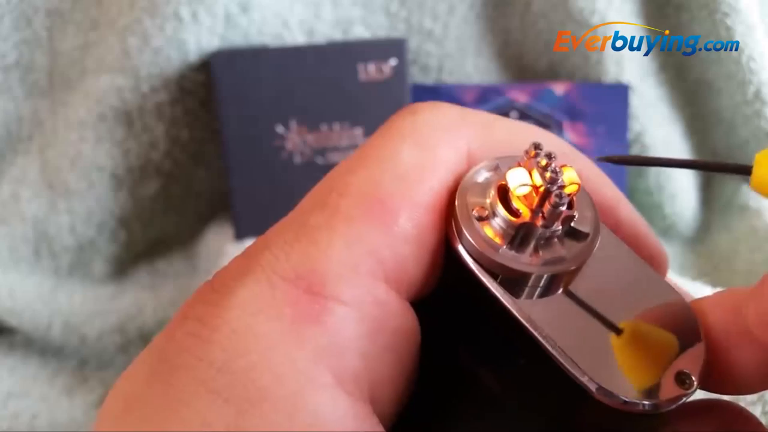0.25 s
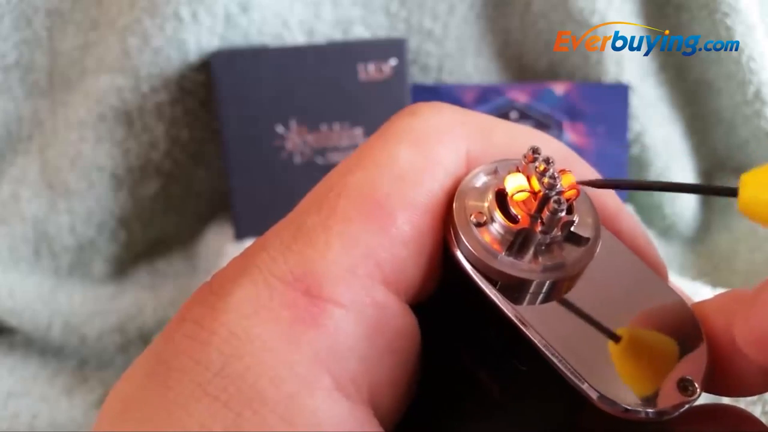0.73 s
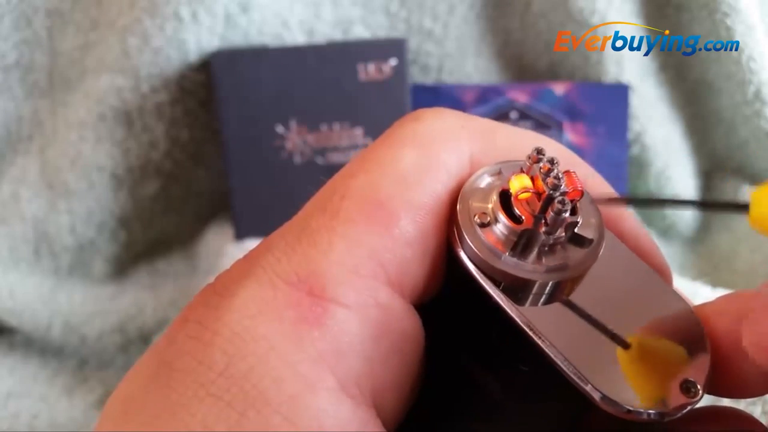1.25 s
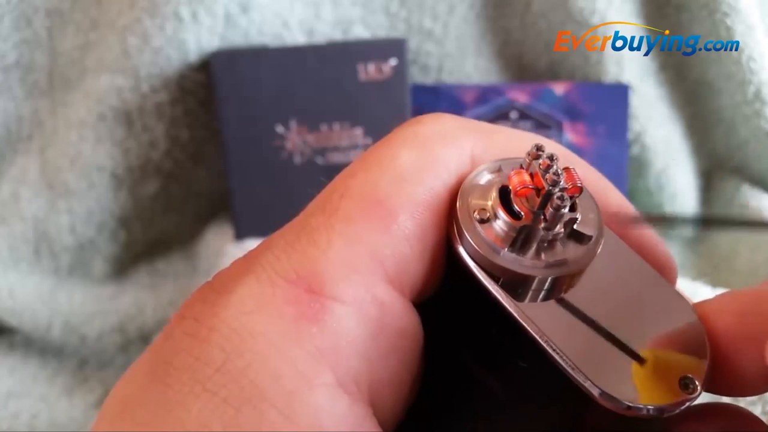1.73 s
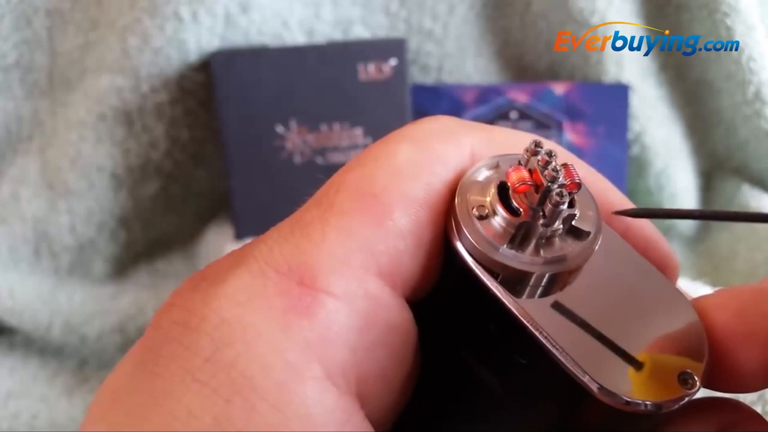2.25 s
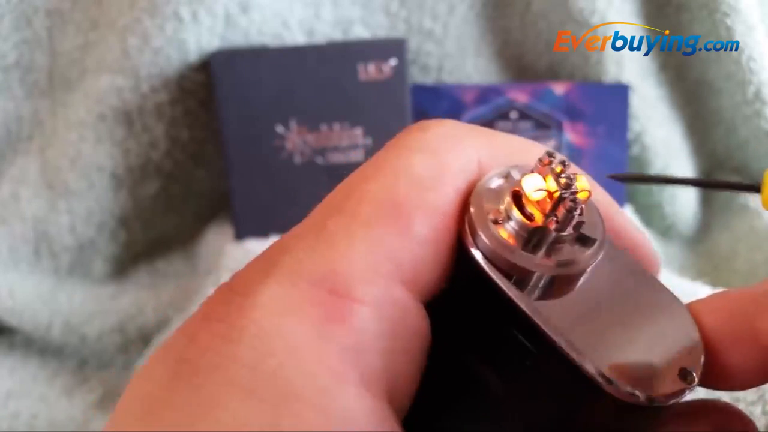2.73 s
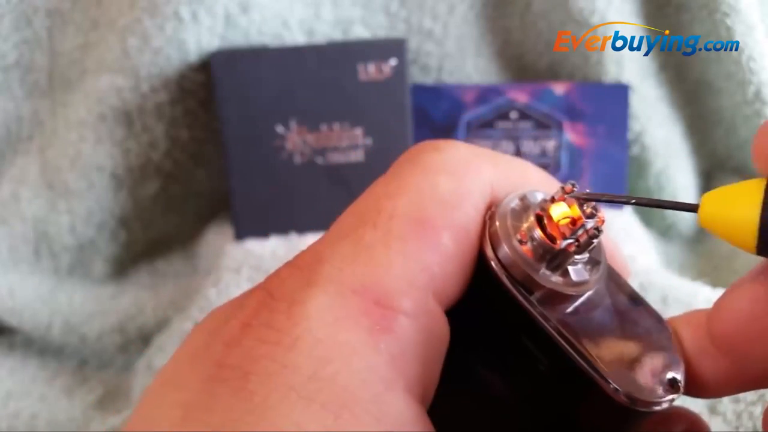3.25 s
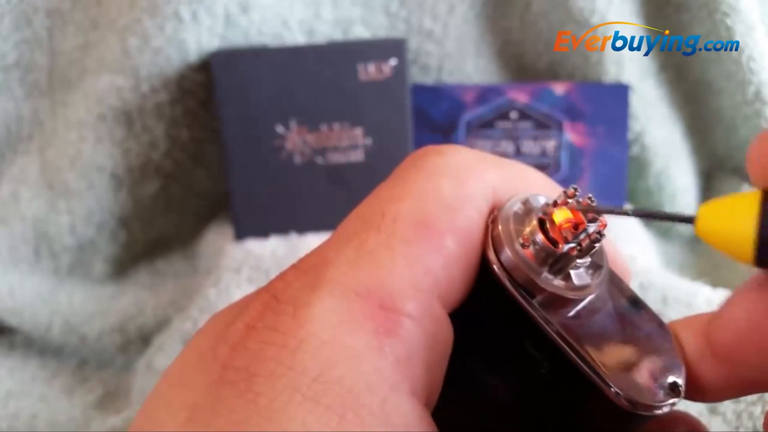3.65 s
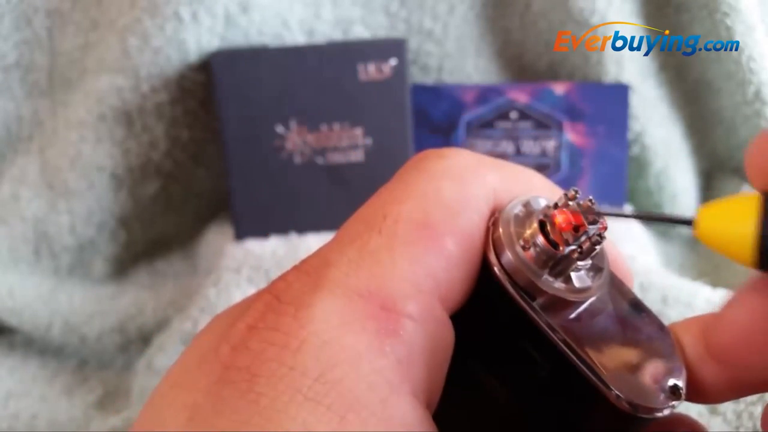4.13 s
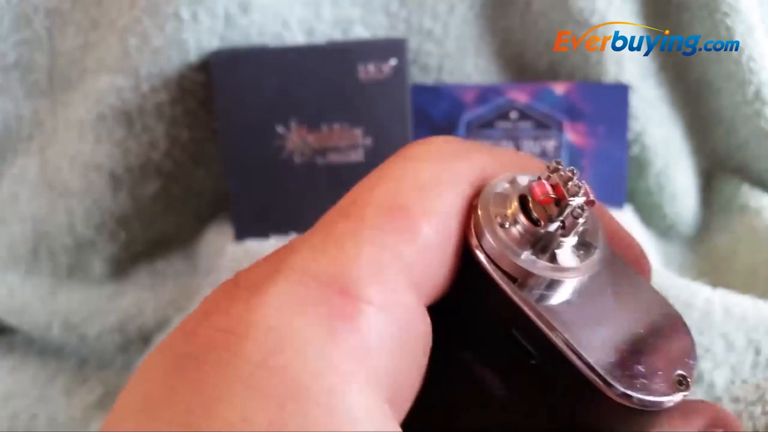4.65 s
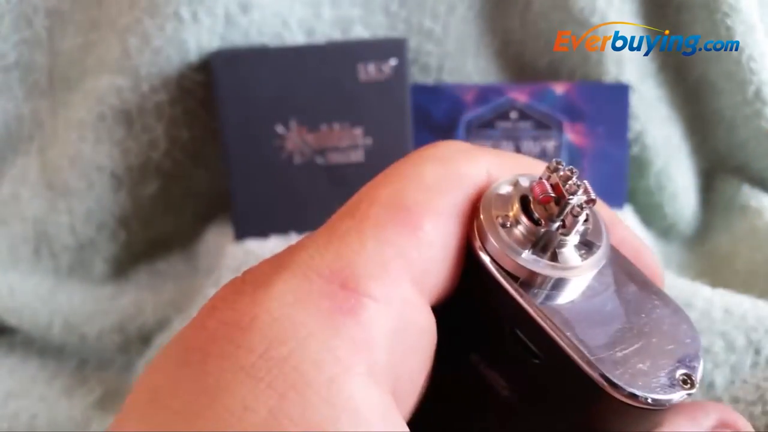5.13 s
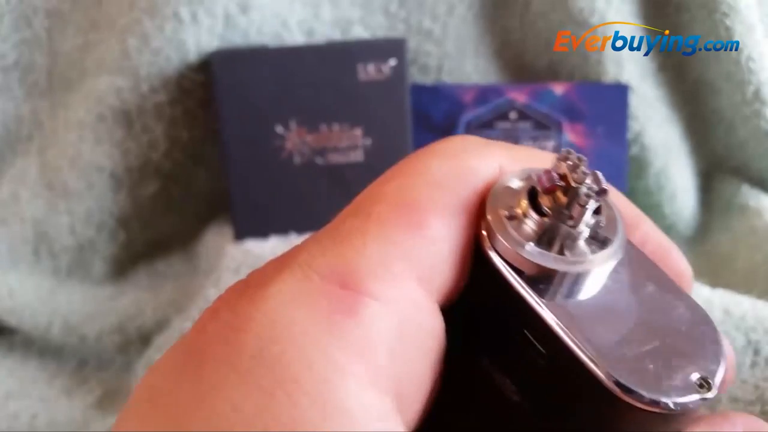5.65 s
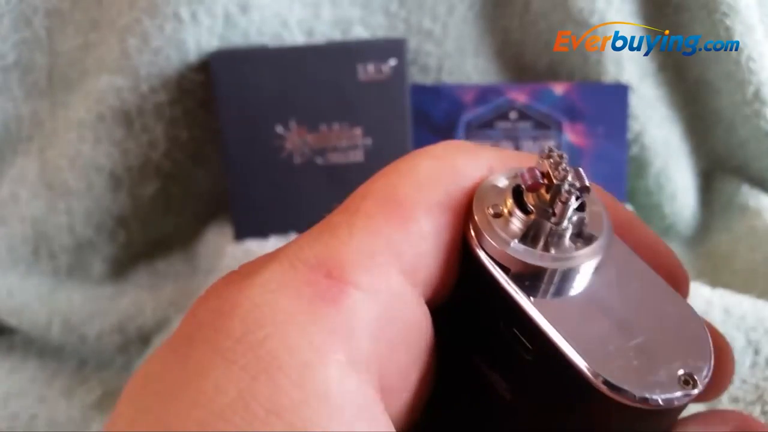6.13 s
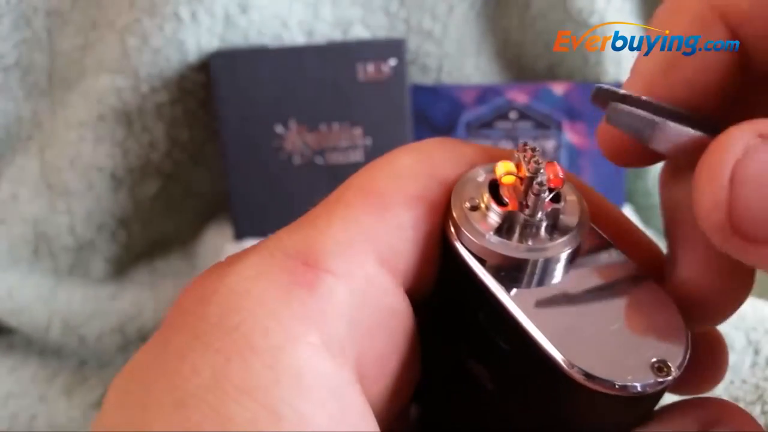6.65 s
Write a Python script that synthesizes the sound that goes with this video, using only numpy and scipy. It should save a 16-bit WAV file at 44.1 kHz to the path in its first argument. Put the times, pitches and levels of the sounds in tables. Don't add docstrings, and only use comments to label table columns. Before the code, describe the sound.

Close up in a quiet humming room, metal scrapes finely across small coils, then a tool clatters down hard and a small part is lifted.

```python
import sys
import numpy as np
from scipy import signal
from scipy.fft import rfft, irfft, next_fast_len
from scipy.io import wavfile
from scipy.ndimage import uniform_filter1d, map_coordinates

SR = 44100
rng = np.random.default_rng(int(sys.argv[2]) if len(sys.argv) > 2 else 0)


def put_to_file(sound):
    columns = np.atleast_2d(sound).T
    safe = np.clip(columns, -1, 1)
    whole_steps = np.round(safe * 32767)
    wavfile.write(sys.argv[1], SR, whole_steps.astype(np.int16))


def gain_from_decibels(decibels):
    exponent = np.asarray(decibels, float) / 20
    return 10 ** exponent


N = 303981

# start in seconds, length in seconds, scrape, low post, upper post in dB.
STROKES = [(1.257, 0.05, -57, -67, -53), (1.311, 0.064, -60.5, -60, -58), (1.536, 0.035, -48, -53.5, -56),
           (1.799, 0.024, -45, -51, -47), (2.029, 0.032, -49.5, -53.5, -56.5),
           (2.278, 0.021, -56, -52, -51), (4.036, 0.047, -49.5, -62.5, -53),
           (4.284, 0.033, -52.5, -60, -51), (4.52, 0.022, -49, -58, -49), (4.738, 0.052, -50.5, -63, -54),
           (4.935, 0.024, -34.5, -55, -46.5)]
# slip in seconds, peak in dB, lower scrape relative to it in dB.
TURNS = [(1.2726, -45, -24), (1.2929, -36, -21), (1.309, -50, -22), (1.3253, -36, -21.5), (1.341, -55, -17),
         (1.5418, -34, -15), (1.548, -43, -19), (1.5554, -40, -16), (1.562, -34, -17), (1.567, -37, -20),
         (1.57, -40, -11), (1.577, -48.5, -16), (1.802, -30, -13.5), (1.8116, -39.5, 1), (1.82, -27, -16),
         (1.8283, -53, -15.5), (2.033, -37, -6.5), (2.0408, -35, -8.5), (2.0486, -36.5, -6.5),
         (2.054, -30, -18), (2.0594, -36, -10), (2.0634, -31, -15.5), (2.0696, -44, -8), (2.2669, -39, -3),
         (2.276, -33, -12), (2.2816, -30.5, -22), (2.2865, -25, -15), (2.289, -37, -22), (2.292, -41, -14),
         (4.0398, -41, -11), (4.05, -39, -19), (4.0583, -41, -16), (4.071, -47, -21), (4.0784, -38, -23.0),
         (4.0844, -52, -17.0), (4.287, -31.5, -22), (4.295, -35.5, -14), (4.301, -37.5, -24),
         (4.3058, -38, -16), (4.3086, -42, -22.5), (4.3122, -37.5, -26), (4.3178, -34, -19.0),
         (4.526, -39, -7), (4.5307, -30.5, -14), (4.535, -34, -18), (4.5397, -38, -17.0),
         (4.5428, -34, -15), (4.5484, -37, -4.5), (4.7495, -28, -13.5), (4.756, -30, -13),
         (4.7614, -39.5, -6), (4.766, -42.5, -20), (4.771, -30, -20), (4.7768, -36, -18), (4.924, -47, -10),
         (4.936, -38, -12), (4.94, -38, -18), (4.9458, -34, -20), (4.949, -39, -22), (4.9551, -34, -13)]
# slip in seconds, peak in dB.
SNAGS = [(1.24, -65), (1.246, -62), (1.254, -62), (1.258, -53), (1.263, -52), (1.2665, -51), (1.269, -50),
         (1.285, -52), (1.2875, -52), (1.29, -47.5), (1.2995, -50), (1.306, -53), (1.333, -51),
         (1.348, -58.5), (1.355, -57), (1.512, -54.5), (1.775, -61.5), (1.793, -60.5), (1.807, -40),
         (1.815, -38.5), (1.824, -49), (2.023, -57), (2.0305, -52), (2.038, -42), (4.032, -52),
         (4.0655, -53), (4.503, -56), (4.515, -52), (4.551, -44), (4.7455, -46), (4.782, -44), (4.921, -42),
         (4.9325, -38.5), (4.9452, -39), (4.959, -49)]
# frequency in Hz, density in dB per Hz.
WIRE_COLOUR = [(2060, -25), (3300, -4.5), (4200, -6.5), (5000, -7), (6410, -2), (8140, -0.5), (10700, 4.5),
               (14400, -2.5), (15600, -11), (16300, -29)]
# frequency in Hz, density in dB per Hz.
LOW_POST_COLOUR = [(500, -62.5), (800, 1), (1050, 3.5), (1400, -5), (1900, -11)]
# frequency in Hz, density in dB per Hz.
HIGH_POST_COLOUR = [(1500, -27), (1950, 1), (2300, 0), (2900, -6), (3800, -15.5), (5000, -59)]
# frequency in Hz, left over right in dB.
WIRE_BALANCE = [(60, -20), (110, -23), (200, -13), (380, 16), (700, -1), (1290, -2), (2380, -1.5),
                (4400, 8.5), (8120, 2.5), (15000, -19.5)]

# start in seconds, peak in dB, panel boom in dB,
# left over right in dB, ring length as a share.
KNOCKS = [
    [(5.6453, -15.5, -16, 3.5, 0.71), (5.6495, -25.5, -21.5, -3.5, 0.66), (5.6585, -28.5, -18, 7, 0.67),
     (5.6878, -32.5, -12.5, 6.5, 0.98), (5.786, -43, -0.5, 9.5, 0.97), (6.834, -45, -9, 9, 1),
     (6.768, -45, -18, 8, 1)],
    [(5.6655, -30.5, 8.5, 8, 0.46), (5.7595, -42.5, 13.5, 5, 0.45), (5.813, -48.5, 10, 9.5, 0.32),
     (5.8991, -9, -12, 11, 0.94)],
    [(5.9369, -13.5, -29, 12.5, 1.29)],
    [(.6815, -42, -40, 2, 0.4), (2.509, -42.5, -40, 4, 0.33), (3.309, -46.5, -44, 6, 0.6)],
]
# frequency in Hz, t60 in seconds, level in dB at each of the four spots.
TABLE_MODES = [(61.8, 0.25, -32.5, -31.5, -22, -40), (268, 0.098, -4, -25, -30.5, -16),
               (356.4, 0.051, -11.5, -0.5, -14, -17), (424, 0.035, 0, -4.5, -12.5, 5),
               (666, 0.013, 6.5, 7, 3, 16), (877, 0.034, -3, -8.5, 2, 1),
               (1026, 0.039, -2.5, 0.5, -8.5, -22), (1208, 0.025, -11.5, -20, -13.5, -32),
               (1600, 0.017, -10.5, -4, -13, -40), (1847, 0.014, -12.5, -11, -6, -40),
               (2010, 0.018, -17, -2, -2, -53), (2235, 0.025, -26, -23, -7, -50),
               (2590, 0.24, -26.5, -29, -40.5, -60), (3400, 0.1, -35, -21, -45.5, -56)]
# frequency in Hz, left over right in dB.
TABLE_BALANCE = [(200, -1), (380, 5.5), (700, -0.5), (1300, -6.5), (2400, -7), (4400, 2.5)]
# start in seconds, peak in dB, pitch in Hz.
CHATTER = [(5.7597, -29, 230), (5.7641, -30.5, 300), (5.7667, -36, 480), (5.7695, -35, 520),
           (5.773, -27.5, 340), (5.7793, -40.5, 400), (5.7818, -31.5, 480), (5.7865, -34, 500),
           (5.7888, -34.5, 620), (5.793, -36, 450), (5.7954, -35, 450), (5.7998, -32.5, 620),
           (5.8039, -40.5, 500), (5.813, -34, 300), (5.82, -36, 280), (5.8349, -38, 300),
           (5.8406, -34.5, 350), (5.848, -41.5, 400), (5.858, -38.5, 500), (5.8663, -41, 600),
           (5.869, -36.5, 520), (5.872, -37, 480), (5.8775, -35.5, 400), (5.717, -38, 500)]

# start in seconds, crack, mid crack, ring in dB, ring pitch in Hz.
CLINKS = [(5.6428, -34, -52, -50, 7350), (5.6423, -70, -70, -42, 3740), (5.6483, -35, -60, -47, 7160),
          (5.659, -44, -52, -51, 7330), (5.6668, -39, -55, -53, 7540), (5.691, -33, -63, -40.5, 7400),
          (5.7586, -51, -66, -53, 7400), (5.7597, -72, -75, -57.5, 5040), (5.7656, -53, -68, -51.5, 7900),
          (5.7854, -47, -63, -50, 7810), (5.792, -57, -69, -52, 7240), (5.851, -54, -56, -47, 7780),
          (5.856, -55, -62, -58, 7970), (5.872, -59, -61, -65.5, 7350), (5.9, -36, -22, -43, 7180),
          (5.935, -55, -61, -44.5, 6700), (5.938, -43, -42, -37.5, 7900), (5.953, -41, -59.5, -44.5, 7200),
          (5.961, -50, -62.5, -48, 7120), (5.997, -49.5, -65, -75, 7350), (6.0322, -50, -71.5, -79, 7200),
          (6.0465, -57, -76, -79, 7230), (6.062, -63.5, -70, -73, 6400), (6.096, -62.5, -66, -75, 7270),
          (6.1755, -61, -67.5, -78, 7220), (6.2205, -90, -70.5, -64, 2900), (6.255, -76, -61, -65, 2860),
          (3.31, -72, -85, -90, 5800), (6.758, -67, -73.5, -77, 7100), (6.7857, -75, -64, -80, 7400),
          (6.815, -62, -66, -61, 7670), (6.827, -65, -70, -69, 7700), (6.834, -45, -63, -54, 7620),
          (6.839, -57, -63, -65, 4900), (6.848, -56, -68, -61, 7600)]
# start in seconds, crack in dB, ring in dB, ring t60 in seconds.
PINGS = [
    (6.269, -56, -58.5, .12),
    (6.4305, -77, -65, .22),
]
# frequency in Hz, density in dB per Hz.
CRACK_COLOUR = [(3000, -38), (4500, -5.5), (7500, -3.5), (9200, -10), (11000, -7.5), (15500, -18),
                (16000, -66)]

# peak in seconds, hold in seconds, low layer in dB, rasp in dB, release in dB per second.
ROLL = [
    (5.647, 0.018, -38, -45.5, 291),
    (5.76, 0.025, -47, -66.5, 76.5),
    (5.875, 0.0077, -72, -77.5, 500.5),
    (5.898, .025, -56, -60.5, 404),
    (5.939, 0.001, -31, -45.5, 704),
    (5.974, 0.029, -77.5, -70, 104),
]
# peak in seconds, hold in seconds, scrape in dB, rasp in dB, release in dB per second.
GRAZE = [
    (6.2545, 0.029, -63, -91, 1600),
    (6.269, 0, -82.5, -58, 1900),
]
# peak in seconds, hold in seconds, rumble in dB, rasp in dB, release in dB per second.
LIFT = [
    (6.772, 0.051, -50, -99, 451),
    (6.84, 0.0039, -63, -59, 352),
]
# frequency in Hz, density in dB per Hz.
ROLL_COLOUR = [(65, -43.5), (110, -12.5), (151, -9.5), (441, -8.5), (546, -14.5), (639, -15.5), (956, -28),
               (1600, -30.5), (2080, -65.5), (3520, -120)]
# frequency in Hz, density in dB per Hz.
RASP_COLOUR = [(1470, -34), (2500, -7), (5310, -11), (7250, -4.5), (8870, -24), (10400, -14.5),
               (15600, -25), (16000, -37.5)]
# frequency in Hz, density in dB per Hz.
NAIL_COLOUR = [(2000, -40), (2700, 0), (3600, -5), (4600, -26)]
# frequency in Hz, density in dB per Hz.
SCUFF_COLOUR = [(90, -7), (150, 3), (280, -7.5), (430, 2), (720, -8), (1150, -7), (1600, -20), (2300, -62)]
# frequency in Hz, density in dB per Hz.
FIZZ_COLOUR = [(2060, -55.5), (3500, -26), (4810, -2), (6010, -14), (7560, 2), (9440, -20), (15200, -27),
               (16000, -49)]

# frequency in Hz, level in dB rms.
MOTOR_LINES = [(33.7, -72), (54.6, -82), (58.3, -53), (75.5, -77.5), (85.9, -69.5), (116.6, -63.5),
               (119.9, -78), (154.8, -65), (174.8, -63.5), (227.4, -65.5), (233.1, -64.5), (236.5, -67.5),
               (240.0, -67), (264.4, -78.5), (267.5, -81), (291.3, -75.5), (298.3, -72), (303.3, -60),
               (349.7, -70), (377.8, -83.5), (407.9, -89.5), (430.5, -87), (483.4, -72.5), (507.1, -75),
               (582.7, -76), (641.0, -78.5)]
# frequency in Hz, level in dB rms.
WHINE_LINES = [(2134, -77.5), (2252, -90), (2296, -76.5), (2306, -78.5), (2329, -73.5), (2361, -75),
               (2425, -85), (2458, -91.5), (2483, -89.5), (2517, -88)]
# frequency in Hz, density in dB per Hz.
RUMBLE_COLOUR = [(12, -130), (25, -93), (50, -79), (70, -82.5), (130, -85.5), (200, -79), (250, -81.5),
                 (340, -83.5), (450, -90), (850, -94), (1020, -92), (1200, -99), (1500, -101), (2000, -150)]
# frequency in Hz, density in dB per Hz.
AIR_COLOUR = [(760, -41), (1300, -22.5), (1590, -13.5), (1760, -10), (2010, -11), (2250, -6), (2380, -2.5),
              (2750, -15.5), (3230, -12.5), (4010, -29), (4890, -42), (6380, -37), (9590, -62),
              (12500, -44), (16200, -66.5), (22000, -120)]
# frequency in Hz, density in dB per Hz.
HISS_COLOUR = [(10500, -53), (12000, -13), (13000, -10), (14000, -3), (14800, -6), (15500, -5),
               (15900, -61.5)]
# frequency in Hz, density in dB per Hz.
CIRCUIT_COLOUR = [(3500, -44), (4500, -2.5), (7500, -2), (8100, -8.5), (10300, -5.5), (11800, 0),
                  (12500, -41)]
# frequency in Hz, likeness from 0 to 1.
ROOM_LIKENESS = [(60, 0.74), (150, 1), (380, 0.42), (950, 0.019), (2380, 0.052), (5980, 0.01),
                 (15000, 0.12)]
# frequency in Hz, left over right in dB.
ROOM_BALANCE = [(60, -1.5), (110, 2), (200, 0.5), (380, 0.5), (700, 4), (1290, 0.5), (2380, 2), (4400, 16),
                (8120, 16.5), (15000, -2)]
# time in seconds, gain in dB.
GAIN = [
    (0, 0),
    (5.9, 1.5),
    (6.08, -6),
    (6.22, -9),
    (6.4, -10.5),
    (6.64, -11.5),
    (6.8, -9.5),
    (6.89, -5.5),
]
# frequency in Hz, t60 in seconds.
WALL_T60 = [(200, 0.16), (2000, 0.55), (6000, 1), (9000, 0.6), (13000, 0.5)]


def unit(x):
    return x / np.sqrt(np.mean(x ** 2) + 1e-20)


def along(points, hz):
    f, v = np.transpose(points)
    return np.interp(np.log(hz + 1), np.log(f + 1), v)


def filtered(x, response):
    size = next_fast_len(x.shape[-1] + 8192)
    spectrum = rfft(x, size) * response(np.fft.rfftfreq(size, 1 / SR))
    return irfft(spectrum, size)[..., :x.shape[-1]]


def noise(colour, likeness):
    def mid_side(hz):
        angle = np.arccos(np.clip(along(likeness, hz), -1, 1)) / 2
        return gain_from_decibels(along(colour, hz)) * np.array([np.cos(angle), np.sin(angle)])

    mid, side = filtered(rng.standard_normal((2, N)), mid_side)
    return unit(np.array([mid + side, mid - side]))


def wobble(rate_hz):
    knots = rng.standard_normal(int(N * rate_hz / SR) + 4)
    return map_coordinates(knots, [np.arange(N) * rate_hz / SR])


def lean(x, balance):
    return filtered(x, lambda hz: gain_from_decibels(np.outer([0.5, -0.5], along(balance, hz))))


def later_left(x, samples):
    return filtered(x, lambda hz: np.exp(-2j * np.pi * np.outer([samples, 0], hz) / SR))


def add(track, start_s, x, pan_db=0):
    part = track[:, round(start_s * SR):][:, :x.shape[-1]]
    part += (x * gain_from_decibels([[pan_db / 2], [-pan_db / 2]]))[:, :part.shape[1]]


def ring(modes, t):
    return sum(gain_from_decibels(db - 60 * t / t60_s) * np.sin(2 * np.pi * hz * t) for hz, db, t60_s in modes)


def coil_resonance(x, depth_db, bins, frames):
    z = signal.stft(x, nperseg=128)[2]
    field = uniform_filter1d(rng.standard_normal(z.shape[1:]), bins, 0)
    field = uniform_filter1d(field, frames, 1)
    return unit(signal.istft(z * gain_from_decibels(depth_db * unit(field)), nperseg=128)[1][:, :N])


def strum():
    t, now = np.arange(SR // 50) / SR, np.arange(N) / SR
    bright, dull, low, high = np.zeros((4, 2, N))

    climb_db_s, snap_db_s, shoulder_db, slip_t60_s = 9001, 30000, -8, 0.0045
    lead_s = len(t) / SR / 4
    climb_db = np.maximum(shoulder_db + climb_db_s * (t - lead_s), snap_db_s * (t - lead_s))
    tick = gain_from_decibels(np.minimum(climb_db, 60 * (lead_s - t) / slip_t60_s))
    snags = [(s, db, -14) for s, db in SNAGS]
    for s, db, low_db in list(TURNS) + snags:
        add(bright, s - lead_s, gain_from_decibels(db - 6.0) * tick)
        add(dull, s - lead_s, gain_from_decibels(db + low_db + 2.0) * tick)

    post_scatter_db = 1
    low_shape = gain_from_decibels(6.5 - 60 * t / 0.028) * (1 - np.exp(-t / 0.00018))
    high_shape = gain_from_decibels(-60 * t / 0.049) * (1 - np.exp(-t / 0.0009))
    starts_s = [row[0] - 0.012 for row in STROKES]
    for s, *_ in TURNS:
        *_, low_db, high_db = STROKES[np.searchsorted(starts_s, s) - 1]
        low_size_db, high_size_db = post_scatter_db * rng.standard_normal(2)
        add(low, s, gain_from_decibels(low_db + low_size_db) * low_shape)
        add(high, s, gain_from_decibels(high_db + high_size_db) * high_shape)

    drag_db, drag_peak_share, rise_db, fall_db_s = -12.5, 0.85, 7, 2800
    for s, length_s, db, _, _ in STROKES:
        top_s = drag_peak_share * length_s
        swell_db = np.minimum(rise_db * (now - s - top_s) / top_s, fall_db_s * (s + top_s - now))
        onset_db = fall_db_s * np.minimum(now - s, 0)
        drag = gain_from_decibels(db + drag_db + swell_db + onset_db)
        bright = bright + drag
        dull = dull + gain_from_decibels(4.0) * drag

    scrape = coil_resonance(noise(WIRE_COLOUR, [(5000, 0.67)]), depth_db=4.5, bins=2, frames=8)
    upper = filtered(scrape, lambda hz: 1 / (1 + (8200 / (hz + 1)) ** 8))
    wire = bright * unit(upper) + dull * unit(scrape - upper)
    posts = low * noise(LOW_POST_COLOUR, [(1000, 0.19)]) + high * noise(HIGH_POST_COLOUR, [(2000, 0.21)])
    return later_left(lean(wire + posts, WIRE_BALANCE), samples=24.33)


def table():
    out, t = np.zeros((2, N)), np.arange(SR // 2) / SR
    panel_hz, panel_t60_s = 145, 0.27
    after_db, after_t60_s = -25, 0.71
    first_push = 1 + 0.89 * np.exp(-t / 0.0022)
    swing = np.sin(2 * np.pi * panel_hz * t) * (1 - np.exp(-t / 0.0021)) * first_push
    wood_onset = 1 - np.exp(-(t / 0.00051) ** 2)
    for spot, knocks in enumerate(KNOCKS):
        for s, db, boom_db, pan_db, share in knocks:
            sway = gain_from_decibels(-60 * t / (panel_t60_s * share)) + gain_from_decibels(after_db - 60 * t / after_t60_s)
            boom = gain_from_decibels(boom_db - 2.0) * sway * swing
            modes = [(hz, levels_db[spot], t60_s * share) for hz, t60_s, *levels_db in TABLE_MODES]
            wood = ring(modes[1::2], t) - ring(modes[::2], t)
            add(out, s, gain_from_decibels(db) * (gain_from_decibels(-5.5) * wood * wood_onset + boom), pan_db)
    return later_left(lean(out, TABLE_BALANCE), samples=6.3)


def chatter():
    out, t = np.zeros((2, N)), np.arange(SR // 40) / SR
    t60_cycles = 3.8
    for s, db, hz in CHATTER:
        decay = gain_from_decibels(db + 5.0 - 60 * t * hz / t60_cycles)
        add(out, s, decay * np.sin(2 * np.pi * hz * t) * (1 - np.exp(-t / 0.0003)), pan_db=5.5)
    return later_left(out, samples=7.3)


def steel():
    out, t = np.zeros((2, N)), np.arange(SR // 4) / SR
    lying_t60_s, held_hz, held_mid_db = 0.042, 7097, -6
    low_share, low_mode_db = 0.51, -13
    high_share, high_mode_db = 1.3, -26
    lying = [(*row, lying_t60_s) for row in CLINKS]
    held = [(s, db, db + held_mid_db, ring_db, held_hz, t60_s) for s, db, ring_db, t60_s in PINGS]
    for s, crack_db, mid_db, ring_db, hz, t60_s in lying + held:
        burst = rng.standard_normal((4, len(t)))
        crack = filtered(burst[:2] * gain_from_decibels(-60 * t / 0.017), lambda f: gain_from_decibels(along(CRACK_COLOUR, f)))
        dull = filtered(burst[2] * gain_from_decibels(-60 * t / 0.013), lambda f: 1 / (1 + ((f - 2500) / 1150) ** 6))
        rattle = unit(filtered(burst[3], lambda f: 1 / (1 + (f / 200) ** 2)))
        rattle_db = 4.1 * np.exp(-(t60_s / 0.097) ** 4) * rattle
        modes = [(hz, 0, t60_s),
                 (hz * high_share, high_mode_db, t60_s * 0.4),
                 (hz * low_share, low_mode_db - 60 * (t60_s > 0.1), t60_s * 1.3)]
        tone = ring(modes, t) * gain_from_decibels(rattle_db)
        hit = gain_from_decibels(crack_db + 2.5) * crack + gain_from_decibels(mid_db + 14.0) * dull + gain_from_decibels(ring_db) * tone
        add(out, s, hit, pan_db=11.0)
    return out


def contact(s, hold_s, db, rise_db_s, release_db_s):
    now = np.arange(N) / SR
    rise_db = rise_db_s * np.minimum(now - s, 0)
    return gain_from_decibels(db + np.minimum(rise_db, release_db_s * (s + hold_s - now)))


def slide():
    out = 0
    # rows, low colour, rasp colour, low rise and rasp rise in dB per second
    rubs = ((ROLL, ROLL_COLOUR, RASP_COLOUR, 4200, 5700),
            (GRAZE, NAIL_COLOUR, CRACK_COLOUR, 2500, 4200),
            (LIFT, SCUFF_COLOUR, FIZZ_COLOUR, 1700, 500))
    for rows, low, high, low_rise, rasp_rise in rubs:
        lumps = sum(contact(s, hold, db, low_rise, release) for s, hold, db, _, release in rows)
        rasp = sum(contact(s, hold, db, rasp_rise, release) for s, hold, _, db, release in rows)
        out = out + lumps * gain_from_decibels(1.6 * wobble(90)) * noise(low, [(400, 1.0)])
        out = out + rasp * gain_from_decibels(2.6 * wobble(140)) * noise(high, [(6000, 0.27)])
    return out * gain_from_decibels([[3], [-3]])


def tones(lines, waver_db, spread):
    t, out = np.arange(N) / SR, 0
    for hz, db in lines:
        split = spread * min(hz / 300, 2) * np.tanh(rng.standard_normal())
        phase = rng.uniform(0, 6.0) + split * np.array([[1], [-1]])
        level = gain_from_decibels(db + 1.5 + waver_db * wobble(3.982))
        out = out + level * np.sin(2 * np.pi * hz * t + 0.5 * wobble(1.53) + phase)
    return out


def room():
    duck_db = np.interp(np.arange(N) / SR, *np.transpose(GAIN))
    bass_hz, bass_duck_share = 600, 0.65
    rumble = gain_from_decibels(-56.0) * noise(RUMBLE_COLOUR, ROOM_LIKENESS)
    bass = filtered(rumble, lambda hz: 1 / (1 + (hz / bass_hz) ** 4))
    motor = tones(MOTOR_LINES, waver_db=1.5, spread=0.37)
    low = gain_from_decibels(bass_duck_share * duck_db) * (bass + motor)
    air = gain_from_decibels(-62.5) * noise(AIR_COLOUR, ROOM_LIKENESS)
    whine = tones(WHINE_LINES, waver_db=4.5, spread=0.35)
    high = gain_from_decibels(duck_db) * (rumble - bass + air + whine)

    hiss_duck_share, gate_db, cut_db_per_db = 0.4, -8, 25
    gated_db = hiss_duck_share * duck_db + cut_db_per_db * np.minimum(duck_db - gate_db, 0)
    hiss = gain_from_decibels(-81.5 + gated_db + 0.7 * wobble(12)) * noise(HISS_COLOUR, ROOM_LIKENESS)
    circuit = gain_from_decibels(-95) * noise(CIRCUIT_COLOUR, ROOM_LIKENESS)
    return lean(low + high + hiss + circuit, ROOM_BALANCE)


def walls(x):
    hz, t, z = signal.stft(rng.standard_normal((2, SR // 2)), SR, nperseg=256)
    decay = gain_from_decibels(-60 * t / along(WALL_T60, hz)[:, None])
    tail = signal.istft(z * decay, SR, nperseg=256)[1]
    late = np.pad(x, ((0, 0), (300, 0)))
    return signal.fftconvolve(late, tail / np.linalg.norm(tail[0]), axes=1)[:, :N]


def scene():
    coil = strum()
    hits = table() + chatter() + steel() + slide()
    echo = walls(gain_from_decibels(-22.0) * coil + gain_from_decibels(-25.0) * hits)
    return coil + hits + echo + room()


def roll_off(x):
    return signal.sosfilt(signal.butter(12, 16480, fs=SR, output="sos"), x)


def record(dry):
    top_hz = 15680
    mix = filtered(dry, lambda hz: 1 / (1 + (hz / top_hz) ** 120))
    return roll_off(mix)


dry = scene()
out = record(dry)
put_to_file(out)
```